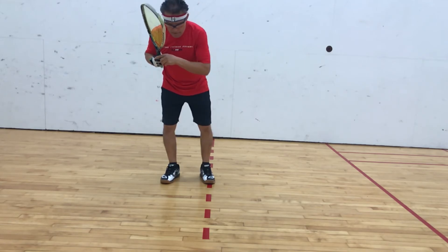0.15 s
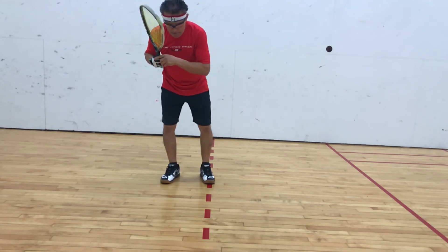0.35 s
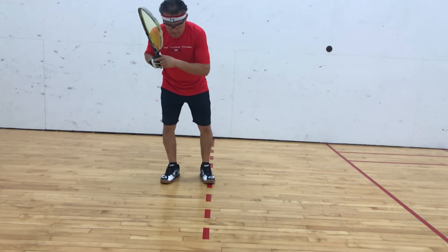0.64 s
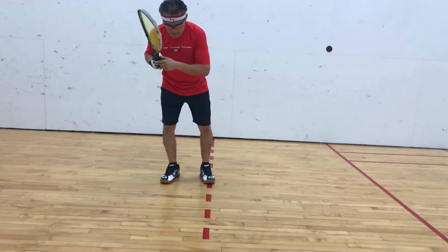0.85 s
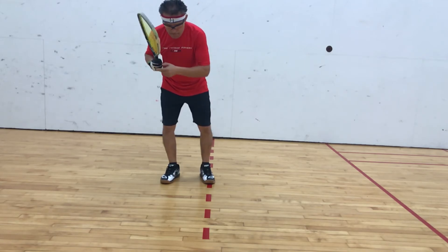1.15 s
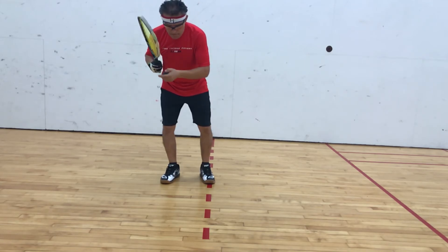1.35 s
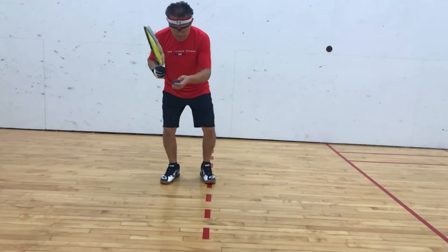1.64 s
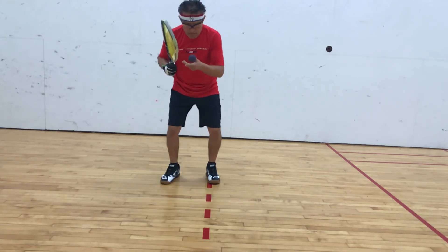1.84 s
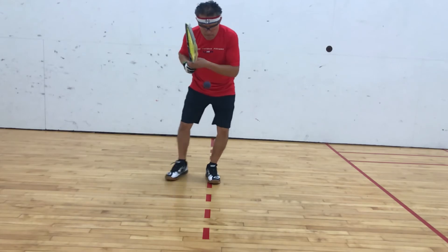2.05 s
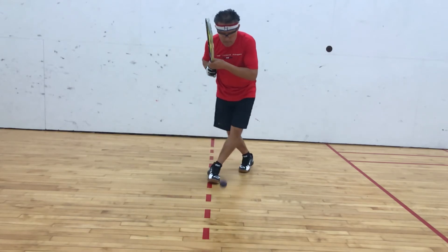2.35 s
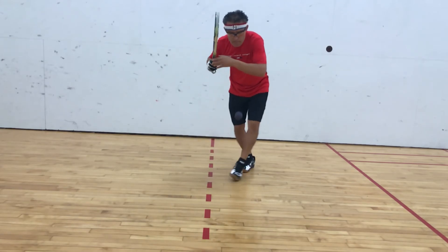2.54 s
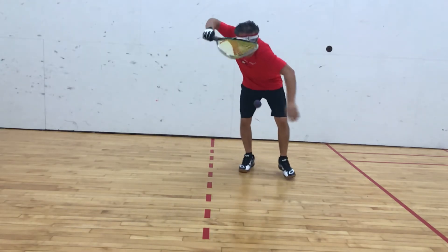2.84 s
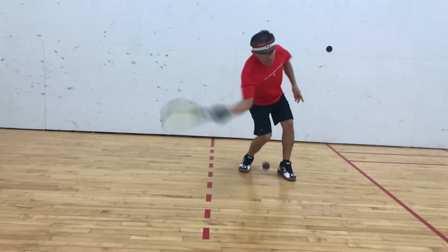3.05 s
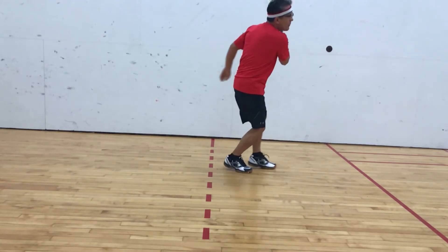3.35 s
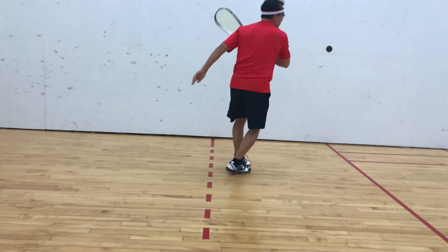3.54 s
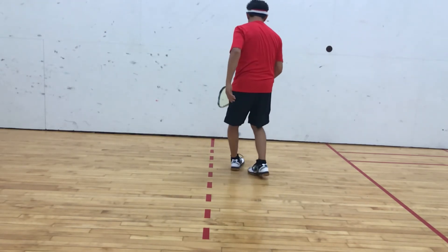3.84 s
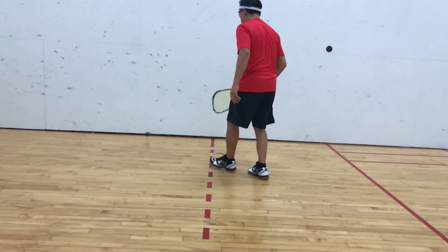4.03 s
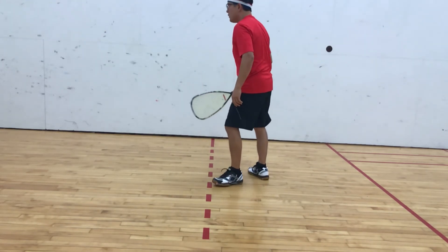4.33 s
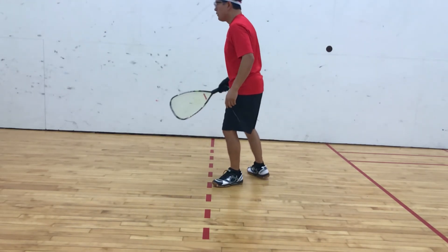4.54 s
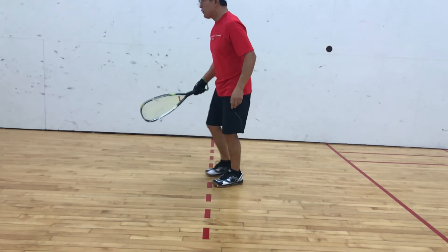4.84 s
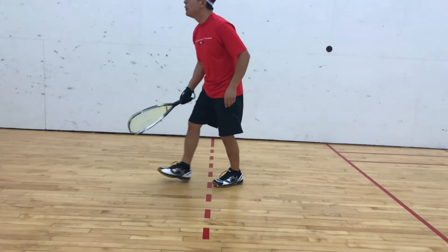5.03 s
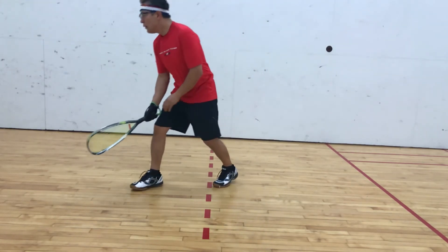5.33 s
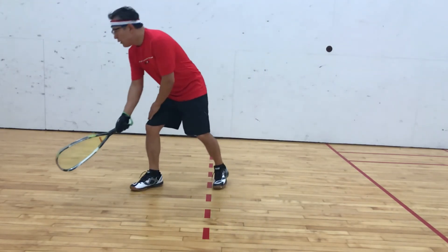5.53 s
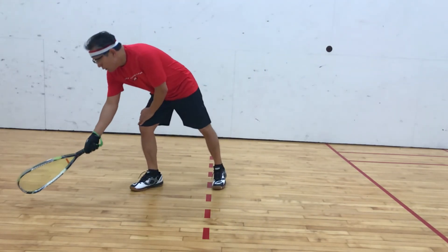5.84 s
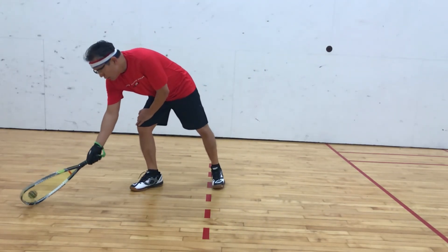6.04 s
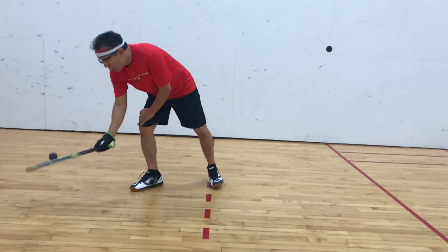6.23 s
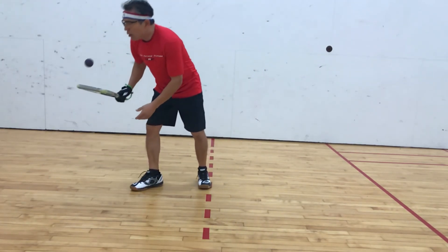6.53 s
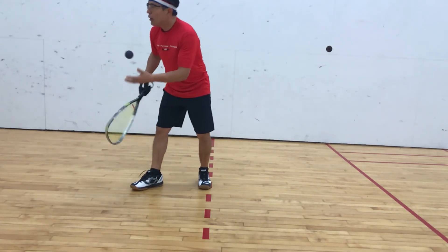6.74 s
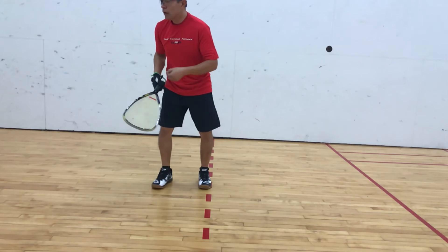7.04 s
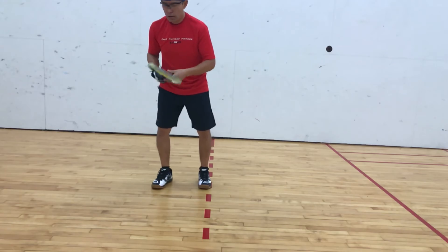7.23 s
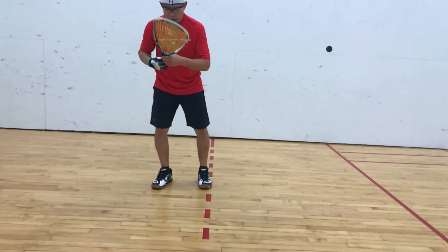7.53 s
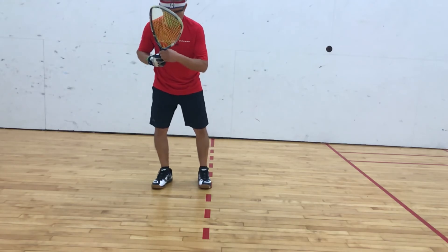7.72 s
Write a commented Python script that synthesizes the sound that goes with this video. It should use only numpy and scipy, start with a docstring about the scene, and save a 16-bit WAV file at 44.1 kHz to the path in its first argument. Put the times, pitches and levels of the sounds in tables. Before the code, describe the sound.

Indoor racquet court, distant microphone, very reverberant. Low dull air noise first, then clearer room tone with rumble. A rubber ball bounces on the wooden floor; a racquet smacks it explosively and the front wall answers with a heavy bang and long diffuse ring. Footsteps thump softly, the ball hits the back wall with a deep knock, and the racquet picks it up in two small hollow taps before quiet returns.

```python
"""Racquet and ball in a hard-walled court

A player bounces a rubber ball, strikes it against the front wall, lets it knock the back wall and scoops it up.
Blows are shaped noise bursts with discrete echoes and seconds of diffuse tail; decaying sines ring the racquet
and a door latch; noise makes ticks, soft patches and the swing, sines with noise the low thumps. The hall tone
is shaped noise, muffled at first, then open; gain control ducks the loud blows."""
import sys
import numpy as np
from scipy import signal
from scipy.fft import rfft, irfft, next_fast_len
from scipy.io import wavfile
from scipy.ndimage import uniform_filter1d, minimum_filter1d

SR = 44100
rng = np.random.default_rng(int(sys.argv[2]) if len(sys.argv) > 2 else 0)


def invert_db(level):
    """Linear amplitude ratio for a level in decibels (20 dB per decade), elementwise."""
    return 10 ** (np.asarray(level, dtype=float) / 20)


def transcribe(u):
    """Save the signal u as a 16-bit wav file named by the first command-line argument.

    u: samples, shape (n,) or (channels, n), limited to [-1, 1]; the rate is SR.
    q: integer samples, one column per channel.
    """
    v = np.clip(np.atleast_2d(u).T, -1, 1)
    q = np.round(v * 32767).astype(np.int16)
    wavfile.write(sys.argv[1], SR, q)


N = 347419

# Source levels are ahead of the gain control; the hiss joins after it.
# hall tone spectra, muffled and open: freq_hz, density_db_per_hz
MUFFLED_SPECTRUM = [(8.8, -41), (15, 3.5), (27, -9), (43, -11), (157, -12.5), (221, -15), (304, -23),
                    (521, -26.5), (561, -27.5), (1260, -41.5), (2560, -53), (4490, -52.5), (5200, -96),
                    (6760, -103), (11400, -120)]
OPEN_SPECTRUM = [(8.8, -58), (15, -36.5), (50, -9), (169, -12), (201, -5), (240, -8.5), (277, -4),
                 (497, -10), (610, -8.5), (1190, -17), (2950, -24.5), (4840, -32.5), (10300, -46.5),
                 (14200, -43.5), (16000, -57.5)]
# short noise patches, the fading echo of earlier play as the hall tone opens, then cloth and soles:
# start_s, length_s, rms_db (ahead of the envelope), centre_hz, width_hz
NOISE_PATCHES = [(1.42, .11, -79.5, 1580, 607), (1.524, 0.35, -74.5, 2866, 858),
                 (1.529, 0.3, -79.5, 4180, 1485), (1.513, 0.16, -79, 6700, 2500),
                 (2.921, .15, -79, 10930, 8030), (4.38, 0.25, -74, 11000, 8970),
                 (5.288, 0.15, -79.5, 6895, 4000), (6.122, 0.012, -62, 9300, 9000),
                 (6.5, 0.044, -75.5, 11900, 7900), (6.758, 0.18, -80.5, 6500, 500),
                 (6.879, 0.24, -79, 12000, 8040), (6.949, 0.18, -75.5, 6280, 3050),
                 (7.146, 0.067, -77.5, 6470, 1985)]
# tick spectrum: freq_hz, density_db_per_hz
TICK_SPECTRUM = [(1000, -39.5), (3000, -16), (6800, 3), (10500, -18.5), (13500, -6), (16000, -7.5)]
# clear ticks of shoes, strings and grip: start_s, peak_db
CLEAR_TICKS = [(1.5948, -49.5), (2.0528, -54.5), (2.479, -56), (2.4915, -53), (3.0093, -51), (4.188, -50),
               (4.5276, -53.5), (4.5734, -51.5), (5.3022, -55), (5.3353, -54.5), (5.4008, -55),
               (6.387, -57.5)]
# low thumps, feet and ball on the sprung floor and the low push of the racquet strike:
# start_s, level_db, pitch_hz
LOW_THUMPS = [(1.988, -53.5, 151), (2.377, -45, 200), (2.42, -35.5, 196), (2.956, -44.5, 182),
              (3.184, -32, 61), (4.038, -37.5, 165), (5.295, -41, 126), (5.675, -52, 198),
              (5.884, -47, 146)]
# spectrum of each kind of blow: freq_hz, density_db_per_hz
BOUNCE = [(30, -42), (60, -19), (130, 10), (200, -11), (290, -6), (500, -8.5), (800, -13), (915, 8),
          (1030, -2.5), (1420, -11.5), (2700, -16.5), (7000, -31), (10400, -43.5), (13500, -40.5),
          (16000, -42.5)]
STRIKE = [(30, -47), (60, -29.5), (120, -35.5), (215, -2), (400, -6), (510, -14.5), (660, -3), (790, -6.5),
          (930, -2.5), (1100, -9), (1400, -14), (2110, -14), (3850, -18), (5300, -19), (6300, -22),
          (7500, -28.5), (10300, -36.5), (16000, -45.5)]
FRONT_WALL = [(30, -29.5), (80, 0), (250, -11.5), (450, -10), (650, -1), (800, -11.5), (960, -2.5),
              (1200, -14.5), (1550, -19.5), (2130, -12.5), (2450, -20), (2760, -15), (3200, -21),
              (16000, -40)]
BACK_WALL = [(30, -38), (55, -7.5), (80, 6), (190, 0.5), (400, -20), (900, -19.5), (2000, -32.5),
             (4000, -33), (7000, -54), (10500, -63), (13000, -67), (16000, -64.5)]
SCOOP = [(30, -61.5), (90, -37), (150, -5), (500, -5), (690, 0), (790, -9.5), (1010, -1), (1270, -11),
         (1500, -8), (2100, -15.5), (4000, -34), (16000, -49)]
FRAME_TAP = [(60, -39), (140, 0), (300, -4.5), (680, -9), (800, -2), (1020, 0), (1250, -18), (1465, 2),
             (1600, -14.5), (2000, -10.5), (2550, -15), (3120, -19.5), (3750, -28), (4400, -30),
             (5500, -46), (10500, -57), (13500, -55), (16000, -58)]
# first echoes in mid court, at the back wall, at the front wall: delay_ms, level_db
MID_COURT = [(4.5, -8), (8, -11.5), (14.5, -17), (20, -37), (25, -19.5), (30, -19), (37, -19)]
BACK_CORNER = [(4.5, -1.5), (21, -8), (25, -16), (31, -18.5), (37, -16), (49, -12.5), (60, -7),
               (103, -21.5)]
FRONT_CORNER = [(2.8, -6), (5.4, -2), (8, -7.5), (16, -7.5), (19, -15.5), (24, -2.5), (26.5, -3.5),
                (35.5, -8.5), (50, -5), (59, 0)]
# blows: start_s, spectrum, first_echoes, direct_db, contact_ms, crack_treble_lift_db, tail_db
BLOWS = [(2.4174, BOUNCE, MID_COURT, -13.5, 1.1, 7, -4.5), (3.1864, STRIKE, MID_COURT, 4, 3.1, 10, 30),
         (3.352, FRONT_WALL, FRONT_CORNER, 13, 1.4, 11, 28),
         (4.7854, BACK_WALL, BACK_CORNER, -9.5, 1.2, 22, 8.5), (6.073, SCOOP, MID_COURT, -11, 2.5, 0, -2.5),
         (6.1308, FRAME_TAP, MID_COURT, -9.5, 1.6, 9.5, -2)]
# decay of the court: freq_hz, t60_s
COURT_DECAY = [(40, 1.6), (80, 1.24), (130, 0.52), (200, 0.47), (300, 2.36), (500, 3.85), (700, 4.58),
               (1000, 4.01), (2000, 3.11), (3000, 2.565), (5000, 1.3), (8000, 0.86), (12000, 0.53),
               (16000, 0.66)]
# fill time of the court: freq_hz, fill_ms
COURT_FILL = [(60, 54), (200, 18), (900, 4.7), (3000, 32), (12000, 25)]
# air through the strings: freq_hz, density_db_per_hz
SWING_SPECTRUM = [(35, -44.5), (60, -15), (250, -1.5), (666, -28), (1820, -21), (2710, -28.5), (2970, -18),
                  (3340, -22), (16000, -37)]
# frame and string modes: freq_hz, width_hz, level_db
RACQUET_MODES = [(1860, 270, -1.5), (3060, 180, -4.5), (4450, 190, -10.5), (5550, 380, -12),
                 (7500, 800, -13)]
# knocks on the racquet: start_s, peak_db, top_mode_lift_db
RACQUET_HITS = [(3.1865, -15, 23.5), (6.0735, -37, -1), (6.1308, -28.5, -10)]

OPENS_S = 1.53  # the open hall tone has taken over


def read(points, hz):
    """Interpolates a table column on a log-frequency axis."""
    f, value = np.transpose(points)
    return np.interp(np.log(hz + 1), np.log(f + 1), value)


def evened(x):
    """Scales to rms 1."""
    return x / np.sqrt(np.mean(x ** 2) + 1e-20)


def add(mix, start_s, sound):
    """Mixes a sound in at start_s."""
    part = mix[round(start_s * SR):][:len(sound)]
    part += sound[:len(part)]


def ramp(start_s, length_s):
    """Rises from 0 to 1 over length_s."""
    return np.clip((np.arange(N) / SR - start_s) / length_s, 0, 1)


def band(x, hz, width_hz):
    """Second-order Butterworth band-pass around hz."""
    edges_hz = np.clip([hz - width_hz / 2, hz + width_hz / 2], 20, SR / 2 - 100)
    return signal.sosfilt(signal.butter(2, edges_hz, "band", fs=SR, output="sos"), x)


def noise(points):
    """Steady noise of rms 1 with the given spectrum."""
    size = next_fast_len(N)
    gain = invert_db(read(points, np.fft.rfftfreq(size, 1 / SR)))
    return evened(irfft(rfft(rng.standard_normal(size)) * gain, size)[:N])


def click(points, lift_db, size=8192):
    """Minimum-phase pulse of energy 1; treble lift grows from 1.2 kHz, full at about 8 kHz."""
    hz = np.fft.rfftfreq(size, 1 / SR)
    lift_share = np.clip(np.log2(hz / 1200 + 1e-9) / 2.75, 0, 1)
    log_gain = np.log(invert_db(read(points, hz) + lift_db * lift_share))
    full = np.concatenate([log_gain, log_gain[-2:0:-1]])
    spectrum = np.exp(np.conj(signal.hilbert(full)))[:len(hz)]
    pulse = irfft(spectrum)[:size // 2]
    return pulse / np.linalg.norm(pulse)


def court_tail():
    """Random reflections that thicken; each band fills and dies at its own speed."""
    t = np.arange(5 * SR) / SR
    odds = np.clip(0.018 + t / 0.14, 0, 1)  # share of samples that hold a reflection
    hits = rng.random(len(t)) < odds
    taps = rng.standard_normal(len(t)) * hits / np.sqrt(odds)
    hz, frame_s, z = signal.stft(taps, SR, nperseg=512)
    filled = 1 - np.exp(-(1000 * frame_s / read(COURT_FILL, hz)[:, None]) ** 1.4)
    decay = invert_db(-60 * frame_s / read(COURT_DECAY, hz)[:, None])
    tail = signal.istft(z * filled * decay, SR, nperseg=512)[1][:len(t)]
    tail *= 1 - np.exp(-t / 0.006)
    return tail / np.sqrt(np.mean(tail[4000:8000] ** 2) * SR)  # unit energy per second at 91-181 ms


def hall():
    """Air handling and distant play as shaped noise: dull, then open over a wandering rumble."""
    muffled_db, open_db, open_fade_db_per_s = -59, -59.5, -0.29
    opening_s, leak_s, leak_db, leak_top_hz = 0.012, 0.2, -11, 4300
    rumble_db, wander_db, wander_top_hz = -65.5, 2.5, 3
    late_s, late_db = 6.4, 4  # rumble is stronger towards the end
    t = np.arange(N) / SR
    opened = ramp(OPENS_S - opening_s, opening_s)
    dull = noise(MUFFLED_SPECTRUM) * invert_db(muffled_db) * (1 - opened)
    clear = noise(OPEN_SPECTRUM) * invert_db(open_db + open_fade_db_per_s * t)
    # a little of the open tone leaks in ahead of the opening
    leak = band(band(clear, leak_top_hz / 2, leak_top_hz), leak_top_hz / 2, leak_top_hz)
    leak *= invert_db(leak_db) * ramp(OPENS_S - leak_s, leak_s)
    clear = clear * opened + leak * (1 - opened)
    wander_hz = wander_top_hz * np.geomspace(0.1, 1, num=12)
    wander = evened(sum(np.sin(2 * np.pi * (hz * t + rng.random())) for hz in wander_hz))
    level_db = rumble_db + wander_db * wander + late_db * ramp(late_s, 0.1)
    rumble = evened(band(band(rng.standard_normal(N), 55, 36), 50, 70))
    return dull + clear + rumble * invert_db(level_db) * opened


def noise_patches():
    """Fading echo of earlier play, then cloth and soles: band noise, quick rise, slower fade."""
    rise_share, fade_share = 0.15, 0.6  # of the length
    out = np.zeros(N)
    for start_s, length_s, rms_db, hz, width_hz in NOISE_PATCHES:
        patch = band(rng.standard_normal(SR), hz, width_hz)[:round(length_s * SR)]
        share = np.linspace(0, 1, len(patch))
        envelope = np.minimum(share / rise_share, 1) * np.minimum((1 - share) / fade_share, 1)
        add(out, start_s, invert_db(rms_db) * evened(patch) * envelope)
    return out


def ticks():
    """Shoes, strings and grip tick: coloured noise dying in 1.9 ms, plus fainter ticks at random."""
    count, from_s, to_s, floor_db, spread_db = 8, 1.6, 7.5, -70.5, 2
    out, t = np.zeros(N), np.arange(4000) / SR
    when, size = rng.random((count, 2)).T
    faint = zip(from_s + when * (to_s - from_s), floor_db - spread_db * np.log(size))
    for start_s, peak_db in CLEAR_TICKS + list(faint):
        burst = rng.standard_normal(len(t)) * np.exp(-t / 0.0019)
        tick = signal.fftconvolve(burst, click(TICK_SPECTRUM, 0))
        add(out, start_s, invert_db(peak_db) * tick / abs(tick).max())
    return out


def low_thumps():
    """Feet and ball on the floor, low push of the strike: a sine and noise under one pulse envelope."""
    rise_cycles = 0.85  # the envelope peaks after this many cycles of the sine
    out, t = np.zeros(N), np.arange(4000) / SR
    for start_s, level_db, hz in LOW_THUMPS:
        rough = band(band(rng.standard_normal(len(t)), 3.2 * hz, 4.2 * hz), 7.9 * hz, 7.4 * hz)
        body = np.sin(2 * np.pi * hz * t) + 0.34 * evened(rough)
        rise = t * hz / rise_cycles
        add(out, start_s, invert_db(level_db) * body * rise * np.exp(1 - rise))
    return out


def contact(contact_ms, patchiness):
    """Rough contact burst; patchiness 0 flattens its random spectrum, 1 keeps it."""
    t_ms = np.arange(600) / SR * 1000
    burst = rng.standard_normal(len(t_ms)) * np.exp(-(t_ms / contact_ms) ** 3)
    spectrum = rfft(burst)
    size = abs(spectrum)
    smear = irfft(evened(size ** patchiness) * spectrum / size)
    return smear * np.exp(-(t_ms / (2 * contact_ms)) ** 3)


def blows():
    """Ball contacts: a coloured burst, its first and scattered echoes, then the court's tail."""
    scatter_count, scatter_ms, scatter_db, scatter_db_per_ms = 24, 140, -15, -0.0486
    echo_patchiness, dulling_db_per_ms = 0.65, 0.08  # later echoes lose treble
    out = np.zeros(N)
    for start_s, spectrum, echoes, direct_db, contact_ms, lift_db, tail_db in BLOWS:
        delays_ms = 4 + scatter_ms * rng.random(scatter_count)
        scattered = [(ms, scatter_db + scatter_db_per_ms * ms) for ms in delays_ms]
        for ms, db in [(0, 0)] + echoes + scattered:  # each path smears the contact anew
            smear = contact(contact_ms, echo_patchiness if ms else 0)
            colour = click(spectrum, lift_db - dulling_db_per_ms * ms)
            add(out, start_s + ms / 1000, invert_db(direct_db + db) * signal.fftconvolve(smear, colour))
        tail = signal.fftconvolve(court_tail(), click(spectrum, 0))
        add(out, start_s, invert_db(tail_db) * tail)
    return out


def swing():
    """Air rushes through the strings: noise that grows until they meet the ball."""
    end_s, top_db, growth_db_per_s = 3.188, -37.5, 339.5
    to_go_s = end_s - np.arange(N) / SR
    level = invert_db(top_db - growth_db_per_s * abs(to_go_s))
    return noise(SWING_SPECTRUM) * level * (to_go_s > 0)


def racquet():
    """Frame and strings ring as decaying sines; hard hits wake the high modes."""
    t, out = np.arange(600) / SR, np.zeros(N)
    top_hz = RACQUET_MODES[-1][0]
    for start_s, peak_db, lift_db in RACQUET_HITS:
        ring = np.zeros(len(t))
        for hz, width_hz, db in RACQUET_MODES:
            mode = np.sin(2 * np.pi * (hz * t + rng.random())) * np.exp(-np.pi * width_hz * t)
            ring += invert_db(db + lift_db * hz / top_hz) * mode
        ring *= np.minimum(t / 0.0006, 1)
        add(out, start_s, invert_db(peak_db) * ring / abs(ring).max())
    return out


def door_latch():
    """Metal in the back wall pings when the ball shakes it: a short decaying sine and its tail."""
    start_s, hz, level_db, tail_db = 4.794, 9350, -47, 9
    t, out = np.arange(1500) / SR, np.zeros(N)
    envelope = np.exp(-t / 0.0016) * np.minimum(t / 0.00098, 1)
    ping = invert_db(level_db) * np.sin(2 * np.pi * hz * t) * envelope
    add(out, start_s, ping)
    add(out, start_s, invert_db(tail_db) * signal.fftconvolve(court_tail(), ping))
    return out


def scene():
    """Sums all sources; patches, ticks, thumps and swing share one court tail."""
    small = noise_patches() + ticks() + low_thumps() + swing()
    small = small + invert_db(2.5) * signal.oaconvolve(small, court_tail())[:N]
    return (hall() + small + blows() + racquet() + door_latch())[None]


def band_limit(x):
    """A steep low-pass at the top of the band."""
    return signal.sosfilt(signal.butter(12, 15900, fs=SR, output="sos"), x)


def record(dry):
    """Gain control cuts fast, holds, recovers steadily; thin hiss joins; peaks round off."""
    threshold_db, cut_per_db, hold_s, recovery_db_per_s = -26, 0.64, 0.5, 14
    hiss_db = -93  # white level ahead of the band-pass
    power = signal.lfilter([0.003], [1, 0.003 - 1], dry[0] ** 2)
    power_db = 10 * np.log10(abs(power) + 1e-12)
    over_db = cut_per_db * np.maximum(power_db - threshold_db, 0)
    hold = round(hold_s * SR) // 2 * 2
    held_db = -minimum_filter1d(-over_db, hold, origin=hold // 2 - 1)  # maximum over the past hold
    fall_db = np.arange(N) * recovery_db_per_s / SR
    cut_db = np.maximum.accumulate(held_db + fall_db) - fall_db
    ducked = dry / invert_db(uniform_filter1d(cut_db, 150))
    hiss = invert_db(hiss_db) * band(rng.standard_normal(N), 11000, 9000)
    hissy = ducked + hiss * ramp(OPENS_S, 0.01)  # no hiss while muffled
    return band_limit(0.35 * np.tanh(hissy / 0.31))


dry = scene()
out = record(dry)
transcribe(out)
```